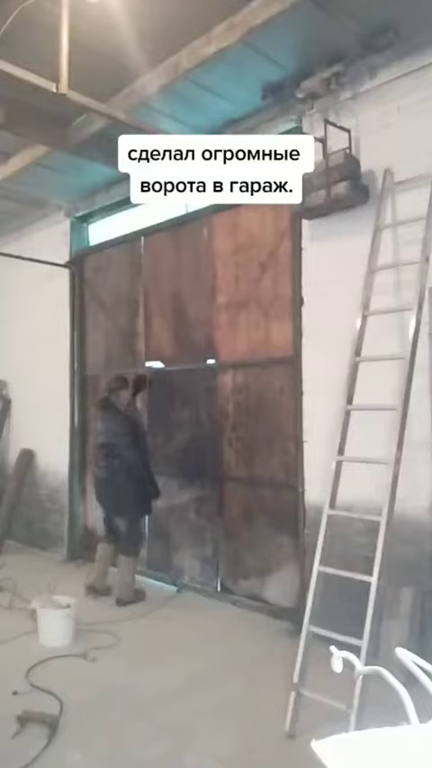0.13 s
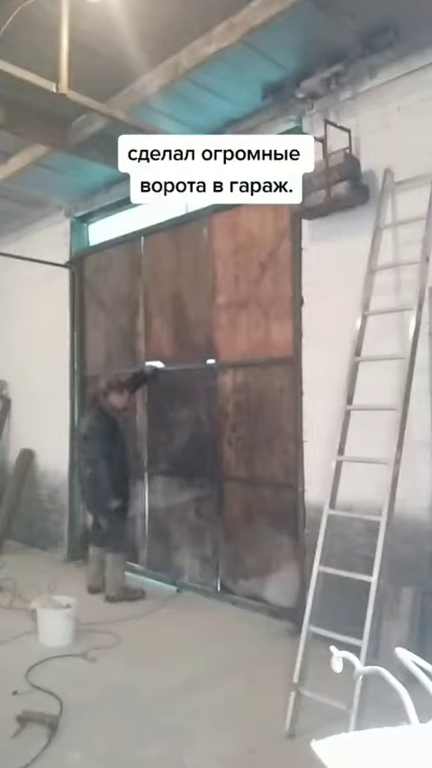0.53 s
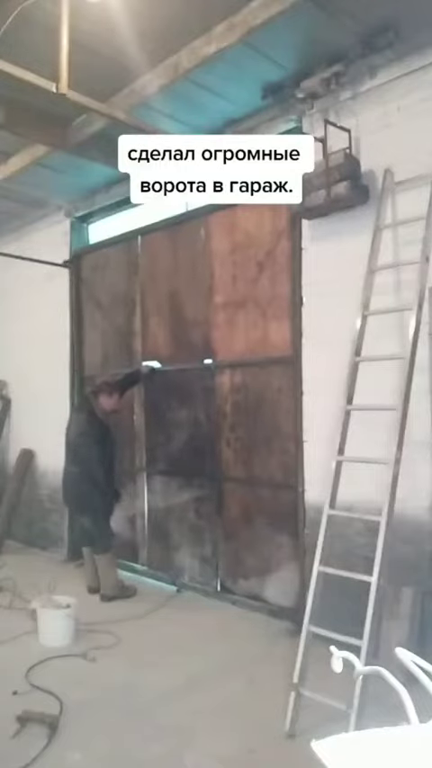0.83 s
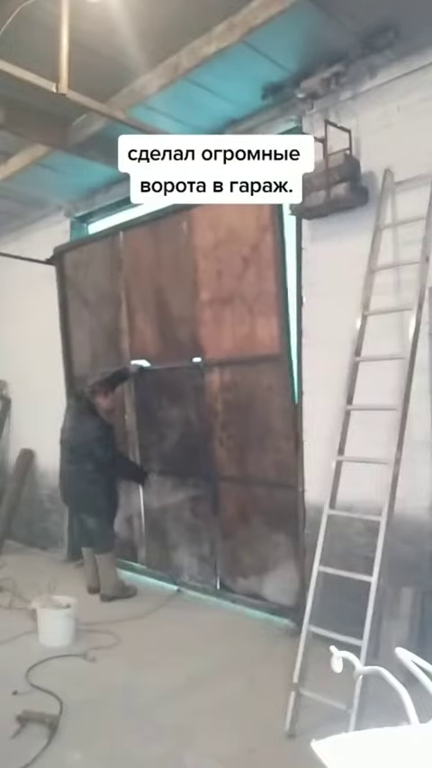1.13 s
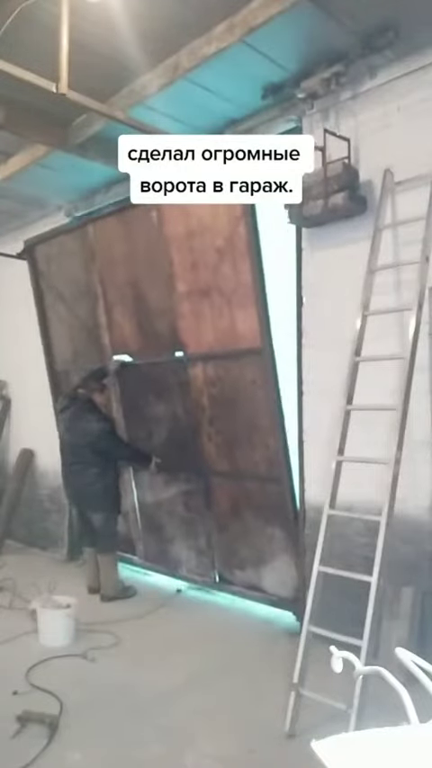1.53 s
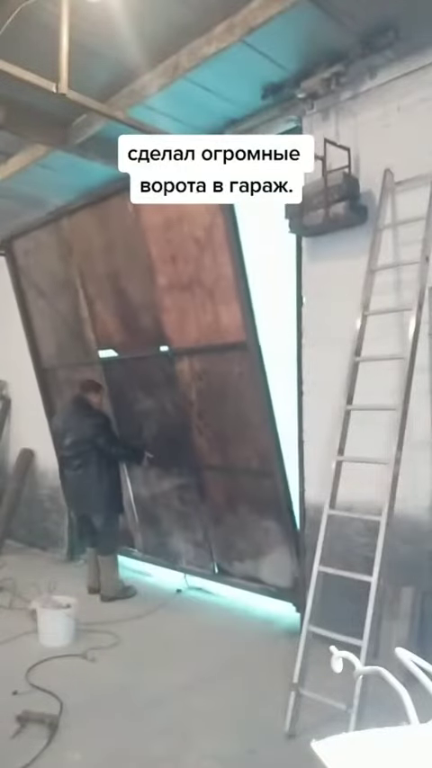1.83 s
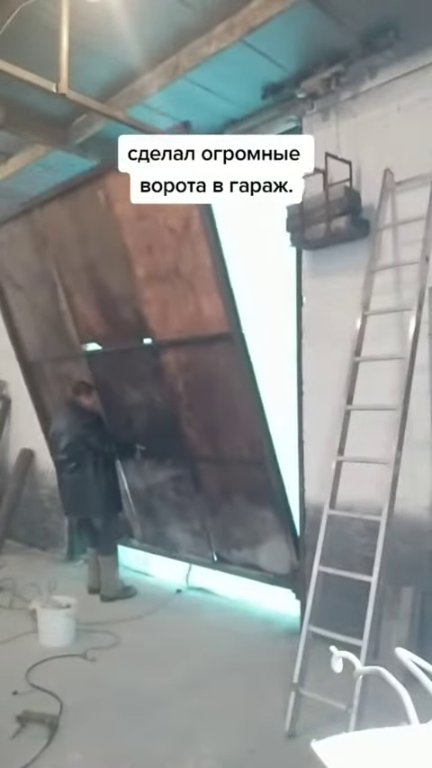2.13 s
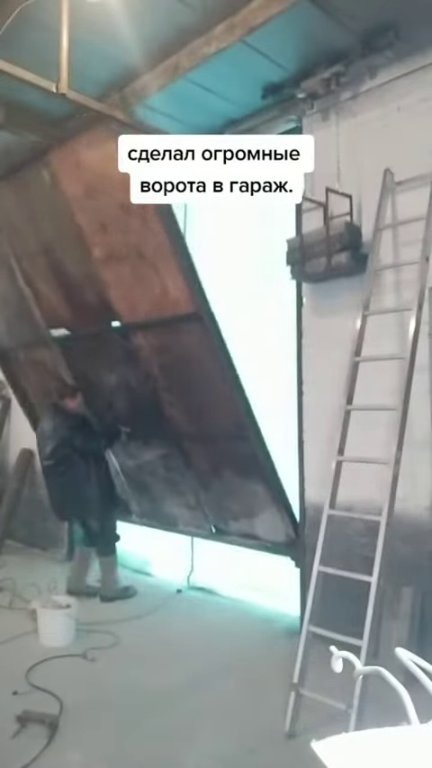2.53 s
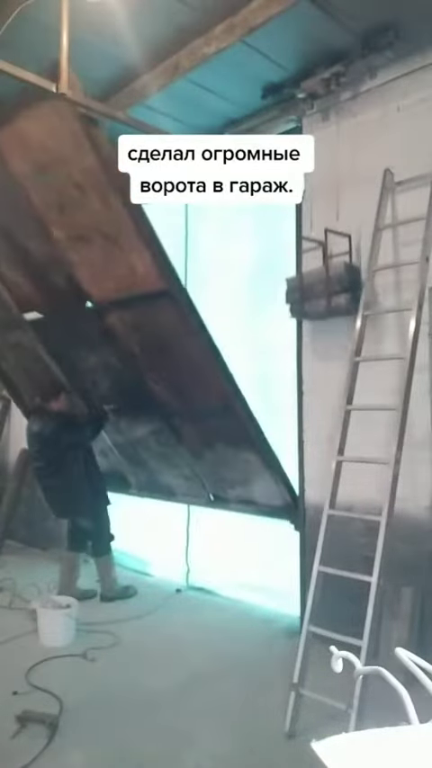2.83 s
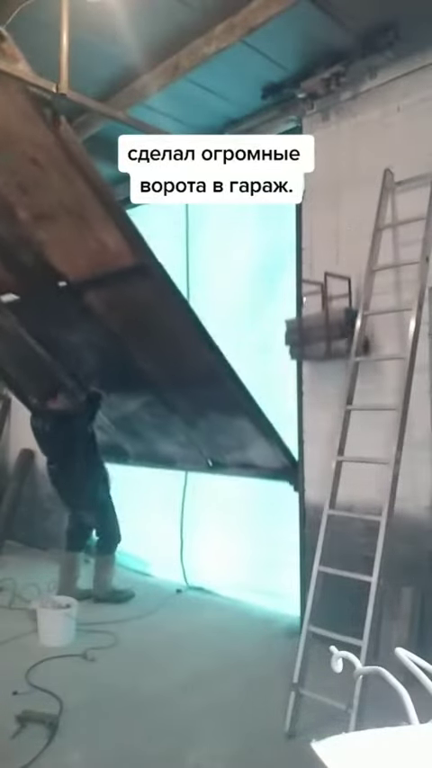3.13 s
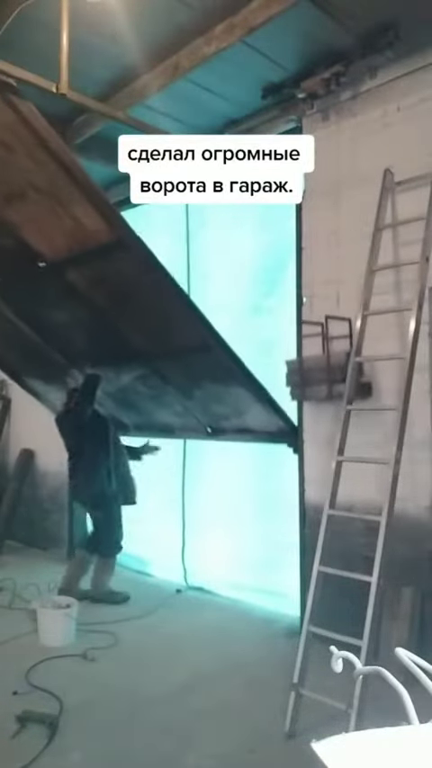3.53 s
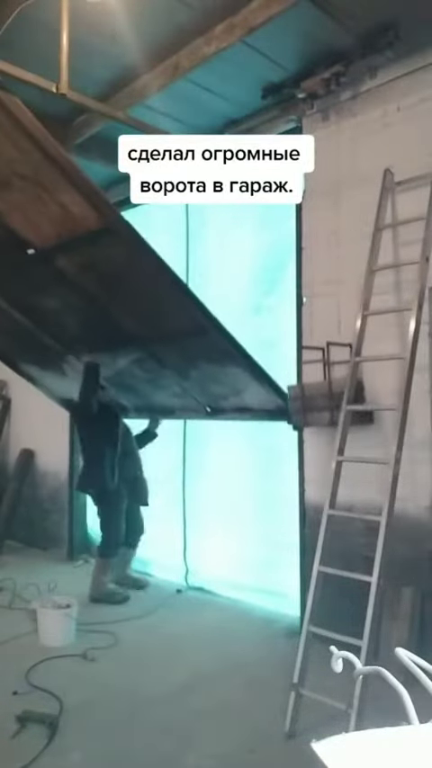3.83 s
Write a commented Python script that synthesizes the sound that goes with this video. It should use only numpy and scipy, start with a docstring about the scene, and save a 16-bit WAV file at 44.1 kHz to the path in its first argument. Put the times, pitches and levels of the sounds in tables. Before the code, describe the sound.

Large metal garage gate rolling open with deep drumming rumble, rail scraping and gusty hiss.

```python
"""First the panels stir faintly and the handle clicks; then a heavy sheet-metal gate rolls up in a bare garage.
Shaped noise makes its deep rumble, the scraping in the rails and a hiss that comes in gusts.
Panel modes hum as narrow wandering tones, knocks are a few low cycles, clicks are two partials and a crack.
It is heard in stereo, from a shared part and a part opposite in left and right."""
import sys
import numpy as np
from scipy import signal
from scipy.fft import rfft, irfft, next_fast_len
from scipy.io import wavfile
from scipy.ndimage import uniform_filter1d

SR = 44100
rng = np.random.default_rng(int(sys.argv[2]) if len(sys.argv) > 2 else 0)


def store_pcm(level_fs):
    """Save levels as 16-bit WAV."""
    pcm = np.round(np.clip(level_fs, -1, 1) * 32767).astype(np.int16)
    wavfile.write(sys.argv[1], SR, np.atleast_2d(pcm).T)


N = 176400

# decay of the bare garage: (pitch [Hz], time to fall by 60 dB [s])
GARAGE_DECAY = [(500, .6), (3000, .4), (8000, 0.13), (15000, 0.12)]
# clicks of the hardware:
# (time [s], level [dB], pitch [Hz], rise [s], upper partial re lower [dB], crack re lower partial [dB])
HARDWARE_CLICKS = [(0.4362, -20.5, 4870, 0.00024, -11, -13), (.7415, -28, 7840, 0.00042, -30, -14),
                   (.828, -35, 5800, 0.002, -25, -14), (1.0235, -32.5, 6330, 0.0006, -25, -5),
                   (1.094, -31, 4070, 0.001, -25, -11), (1.797, -33, 5800, .002, -26, -12),
                   (2.4126, -22.5, 5800, 0.001, -25, -15)]
# dull knocks of the frame: (time [s], level before the lasting push is removed [dB], pitch [Hz])
FRAME_KNOCKS = [(.441, -28, 487), (1.177, -5, 344), (1.277, -16, 557), (1.344, -10.5, 400),
                (1.424, -10.5, 384), (1.643, -10, 380), (2.441, -5, 400), (3.385, -12, 454)]
# panel modes that hum for a while:
# (middle [s], reach to either side [s], pitch [Hz], level against the drumming column [dB])
PANEL_HUMS = [(.282, 0.012, 260, 4.5), (.312, 0.037, 240, 7), (.34, .015, 281, 1),
              (0.268, 0.066, 1440, -11.5), (1.37, 0.44, 306, -2.5), (1.232, 0.041, 306, 7),
              (1.33, 0.07, 308, 2.5), (1.565, 0.061, 222, 6.5), (2.2, 0.057, 310, 2), (2.8, 0.021, 340, 2),
              (2.635, 0.034, 310, -1), (2.6, 0.097, 1880, -14.5), (2.82, 0.071, 600, -6),
              (2.06, 1.04, 339, -2), (2.07, 0.14, 540, -7), (2.245, 0.053, 180, -1), (2.12, 0.077, 325, -3),
              (2.19, 0.023, 450, 2), (3.53, 0.093, 430, -1), (3.008, 0.19, 236, -3.5), (3.1, 2.05, 578, -9),
              (3.23, 0.19, 338, -8), (3.61, 0.56, 440, -3), (3.83, 0.26, 625, -6.5),
              (2.8, 1.7, 1520, -24.5), (2.63, 2.1, 1700, -24.5), (2.74, 1.66, 2230, -25.5),
              (1.41, 0.32, 100, -22)]
# noise in the rails, levels over time, with some abrupt rises:
# (time [s], scrape level [dB], hiss level [dB], top hiss level [dB])
RAIL_LEVELS = [
    [(0.2, -62, -61, -63), (0.26, -41.5, -45, -47.5), (0.38, -52.5, -53.5, -59), (0.432, -47, -48, -54)],
    [(0.438, -39.5, -34.5, -40), (0.452, -42, -46, -48), (0.622, -48.5, -53, -60.5), (0.66, -46, -48, -56)],
    [(0.668, -40, -40, -48), (0.678, -41, -44.5, -50), (0.736, -44, -43, -50), (0.738, -40, -44, -47)],
    [(0.744, -48, -35, -38.5), (0.76, -42, -41.5, -47), (0.816, -46.5, -45, -52), (0.825, -43, -43, -51)],
    [(0.832, -40, -39, -45.5), (0.888, -44, -46.5, -53.5), (1.012, -54, -53, -57), (1.02, -57, -47, -58)],
    [(1.027, -43, -43, -54), (1.1, -32.5, -39.5, -45), (1.287, -36, -42.5, -54), (1.3, -37.5, -45.5, -55)],
    [(1.4, -34.5, -42, -53), (1.46, -36.5, -44, -54), (1.53, -35.5, -40, -48), (2.03, -32, -37.5, -46.5),
     (2.14, -35, -38.5, -49.5), (2.23, -28, -37.5, -45), (2.28, -30.5, -36.5, -48), (2.43, -25, -30, -43.5),
     (2.51, -28, -36.5, -44.5), (2.57, -23.5, -29.5, -33), (2.64, -26, -30, -34.5), (2.73, -28, -36, -47),
     (2.83, -24.5, -28.5, -35), (3.03, -30, -34, -41.5), (3.06, -28.5, -31.5, -40), (3.18, -27.5, -31, -38),
     (3.22, -30, -35, -40.5), (3.46, -28, -32.5, -40.5), (3.63, -36.5, -41.5, -49),
     (3.8, -39.5, -45.5, -49), (3.84, -34.5, -43, -46), (3.88, -39, -44, -50), (3.93, -36.5, -40, -44),
     (4.0, -35.5, -40.5, -46)],
]
# spectra of the rail noises: (pitch [Hz], relative level [dB])
SCRAPE_SPECTRUM = [(500, -20), (800, -26), (1100, -7.5), (1500, 2), (1900, -0.5), (2350, -2.5),
                   (2800, -8.5), (3500, -18.5), (5000, -33)]
HISS_SPECTRUM = [(1800, -30), (2800, -0.5), (3500, 0.5), (4300, 0.5), (4900, -1.5), (5700, -1),
                 (6400, -2.5), (6700, -6), (9000, -16.5)]
TOP_HISS_SPECTRUM = [(5500, -30), (7000, -0.5), (9000, -1.5), (11000, 1), (12500, -2.5), (14000, -3.5),
                     (15000, -6.5), (16200, -8)]
# the gate at rest, starting, rolling; levels before the trims in rumble():
# (time [s], body level [dB], upper drumming level [dB], deepest part level [dB])
RUMBLE_LEVELS = [
    [(0.2, -54, -50, -76), (0.234, -45, -43, -55), (0.274, -33.5, -31, -69), (0.474, -46, -39, -61),
     (0.506, -33, -36, -83), (0.524, -42, -36, -67), (0.548, -41.5, -39.5, -84), (0.736, -35.5, -35.5, -60),
     (0.802, -42.5, -38.5, -83), (0.866, -33.5, -36, -53), (0.956, -43.5, -44.5, -75),
     (1.02, -39, -42, -62)],
    [(1.026, -42, -29, -56), (1.04, -30, -25, -56), (1.074, -23, -22.5, -48), (1.09, -17, -19.5, -51),
     (1.196, -21, -17, -45), (1.226, -18.5, -19.5, -46), (1.25, -18, -20.5, -42)],
    [(1.3, -17, -18.5, -40), (1.77, -17.5, -17, -40), (1.86, -17.5, -19, -33), (2.16, -20, -16, -59),
     (2.37, -15.5, -15.5, -57), (3.07, -19.5, -17.5, -36), (3.16, -18.5, -15.5, -58), (3.95, -18, -20, -56),
     (4.0, -22, -18.5, -38)],
]
# spectra of the rumble's three parts: (pitch [Hz], relative level [dB])
DEEP_SPECTRUM = [(20, -36), (60, -26), (85, -15), (110, -20), (140, 18), (190, 9), (260, -40)]
BODY_SPECTRUM = [(100, -36), (145, -13.5), (180, -8), (220, 5), (280, 2), (340, 4), (420, -6), (600, -27)]
DRUM_SPECTRUM = [(250, -9.5), (350, -13), (440, 4.5), (560, -2), (700, -7.5), (830, -13.5), (900, -35),
                 (1300, -29), (1800, -43)]
# gain on the part opposite in left and right: (pitch [Hz], gain [dB])
STEREO_WIDTH = [(30, -22), (120, -24), (300, -30), (450, -19), (650, -9), (800, -4.5), (1000, 11),
                (1300, 0), (1700, -2), (2200, -3.5), (3200, -2), (6000, -1), (16000, 0)]
# tilt between the sides: (pitch [Hz], left minus right [dB])
STEREO_LEAN = [(60, -1), (99, -2), (160, -1), (270, -1), (450, 0.5), (740, 4), (950, 0.5), (1220, 1.5),
               (2010, -1.5), (3330, 0.0), (5500, 3.5), (9080, 6.5), (15000, 2.5)]

START_S = .197  # the sound opens here
GARAGE_DB = -3
RIPPLE_DB = 1.3  # fine fixed unevenness across pitch, at full depth above 1500 Hz
UPPER_RATIO = 2.15  # pitch of a click's upper partial over the lower
KNOCK_TURNS = 0.97  # cycles up to the peak
HUM_SHARPNESS = 33.6  # pitch over width, for each of two smoothing stages
HUM_STEADY_S = 0.17  # hums well below this reach keep to a steady ring
NOTCH_HZ, NOTCH_WIDTH_HZ, NOTCH_DB = 956, 67, -17  # a narrow dip in the shared part
LIMIT = 1.6  # ceiling of the soft limiting (full scale = 1)
EDGE_HZ = 15900  # upper band limit


def amp(db):
    """Decibels to gain."""
    return 10 ** (np.asarray(db) / 20)


def evened(x):
    """Scales a signal to an RMS of one."""
    return x / np.sqrt(np.mean(x ** 2) + 1e-20)


def read(points, hz):
    """Reads a curve at any pitch, joining its points along log frequency."""
    point_hz, value = np.transpose(points)
    return np.interp(np.log(hz + 1), np.log(point_hz + 1), value)


def level(table, order):
    """One level column of a table as gain over time."""
    rows = np.concatenate(table)
    return amp(np.interp(np.arange(N) / SR, rows[:, 0], rows[:, order]))


def rush(colour, patchy_db, flicker_db, size):
    """Two unrelated noises of one colour, with narrow drifting patches and a flicker across all pitches."""
    hz = np.fft.rfftfreq(size, 1 / SR)
    frames = 4 * N // size + 5
    a, b, c, d, patches = rng.standard_normal((frames, len(hz), 5)).T
    # patches spread a little in pitch and longer in time
    patches = uniform_filter1d(patches, size=3, axis=0)
    patches = evened(uniform_filter1d(patches, size=24, axis=1))
    flicker = evened(uniform_filter1d(rng.standard_normal(frames), size=5))
    inside = (hz >= colour[0][0]) & (hz <= colour[-1][0])
    noise = np.array([a + 1j * b, c + 1j * d]) * inside[:, None]
    noise = noise * amp(read(colour, hz)[:, None] + patchy_db * patches + flicker_db * flicker)
    return evened(signal.istft(noise, nperseg=size, noverlap=3 * size // 4)[1][:, :N])


def garage(dry):
    """The bare room answers with a noise tail whose treble dies sooner than its bass."""
    hz, t, tail = signal.stft(rng.standard_normal((2, SR // 2)), SR, nperseg=128)
    decay = amp(-60 * t / read(GARAGE_DECAY, hz)[:, None])
    tail = signal.istft(tail * decay, SR, nperseg=128)[1]
    tail = tail / np.linalg.norm(tail[0])
    return amp(GARAGE_DB) * signal.fftconvolve(dry[None], tail, axes=1)[:, :N]


def clicks():
    """Short metal ticks of two partials and a noisy crack, then the garage answers."""
    dry, t = np.zeros(N + 2000), np.arange(2000) / SR
    cracks = rng.standard_normal((len(HARDWARE_CLICKS), 2000))
    for (s, db, hz, rise, upper_db, crack_db), crack in zip(HARDWARE_CLICKS, cracks):
        upper_hz = hz * UPPER_RATIO
        ring = np.sin(2 * np.pi * hz * t)
        if upper_hz < EDGE_HZ:
            ring += amp(upper_db) * np.sin(2 * np.pi * upper_hz * t)
        envelope = t / rise * np.exp(1 - t / rise)  # peaks at one after the rise time
        dry[round(s * SR):][:2000] += amp(db) * (ring + amp(crack_db) * crack) * envelope
    return dry[:N] + garage(dry)


def knocks():
    """A few low cycles where a roller jumps in its rail."""
    out, t = np.zeros(N + 2000), np.arange(2000) / SR
    for s, db, hz in FRAME_KNOCKS:
        u = t * hz / KNOCK_TURNS
        out[round(s * SR):][:2000] += amp(db) * np.sin(2 * np.pi * hz * t) * u * np.exp(1 - u)
    out = out - uniform_filter1d(out, size=600)  # no lasting push
    return out[:N] * np.array([[1], [.5]])  # shared, opposite


def hums():
    """Rolling noise feeds narrow panel modes, which swell and fade with the drumming."""
    t, out = np.arange(N) / SR, np.zeros((2, N))
    for middle, reach, hz, db in PANEL_HUMS:
        r = np.exp(-np.pi * hz / HUM_SHARPNESS / SR)  # higher modes are wider
        a, b = rng.standard_normal((2, 2, N // 8 + 1)).repeat(8, axis=2)[..., :N]
        wander = a + 1j * b
        for _ in range(2):
            wander = signal.lfilter([1 - r], [1, -r], wander)
        steady = 2.5 * np.exp(-(reach / HUM_STEADY_S) ** 2)
        wander = evened(wander.real) + 1j * evened(wander.imag) + steady
        tone = evened((wander * np.exp(2j * np.pi * hz * t)).real)
        swell = np.cos(np.pi / 2 * np.clip((t - middle) / reach, -1, 1)) ** 2
        out += amp(db) * swell * tone
    return level(RUMBLE_LEVELS, order=2) * out


def rails():
    """Friction in the rails: a mid-band scrape below a gusting hiss and its top."""
    scrape = rush(SCRAPE_SPECTRUM, patchy_db=2.0, flicker_db=-0.2, size=1024)
    hiss = rush(HISS_SPECTRUM, patchy_db=1.5, flicker_db=0.55, size=512)
    top = rush(TOP_HISS_SPECTRUM, patchy_db=2.5, flicker_db=0.64, size=512)
    layers = [scrape, hiss, top]
    return sum(level(RAIL_LEVELS, order) * layer for order, layer in enumerate(layers, start=1))


def rumble():
    """The rolling gate as three bands of noise: body, upper drumming and deepest part."""
    body = rush(BODY_SPECTRUM, patchy_db=1.04, flicker_db=0.35, size=1024)
    drum = amp(-1.0) * rush(DRUM_SPECTRUM, patchy_db=0.95, flicker_db=0.73, size=1024)
    deep = amp(-2.5) * rush(DEEP_SPECTRUM, patchy_db=-1.0, flicker_db=1.2, size=2048)
    layers = [body, drum, deep]
    return sum(level(RUMBLE_LEVELS, order) * layer for order, layer in enumerate(layers, start=1))


def scene():
    """Returns the shared part and the part opposite in left and right."""
    return clicks() + knocks() + hums() + rails() + rumble()


def record(dry):
    """Shared plus and minus opposite become left and right; then soft limiting and the band limit."""
    size = next_fast_len(N + 8192)
    hz = np.fft.rfftfreq(size, 1 / SR)
    ripple = uniform_filter1d(rng.standard_normal(len(hz)), size=100)
    ripple = evened(uniform_filter1d(ripple, size=100))
    ripple_db = RIPPLE_DB * np.clip(ripple, -3, 2) * np.clip(hz / 1500, .3, 1)
    shared, opposite = rfft(dry, size) * amp(ripple_db)
    shared = shared * amp(NOTCH_DB * np.exp(-((hz - NOTCH_HZ) / NOTCH_WIDTH_HZ) ** 2))
    opposite = opposite * amp(read(STEREO_WIDTH, hz))
    lean = amp(read(STEREO_LEAN, hz) / 2)  # half of the tilt on each side, in opposite senses
    left, right = (shared + opposite) * lean, (shared - opposite) / lean
    pair = irfft(np.array([left, right]), size)[:, :N]
    pair = LIMIT * np.tanh(pair / LIMIT)
    pair = pair * np.clip((np.arange(N) / SR - START_S) / .002, 0, 1)  # opens over 2 ms
    low_pass = signal.firwin(1023, EDGE_HZ, window=("kaiser", 9), fs=SR)
    return signal.oaconvolve(pair, low_pass[None], "same")


dry = scene()
out = record(dry)
store_pcm(out)
```